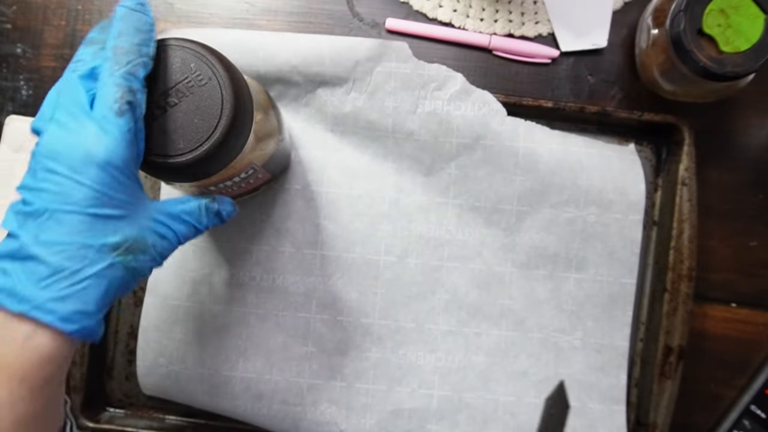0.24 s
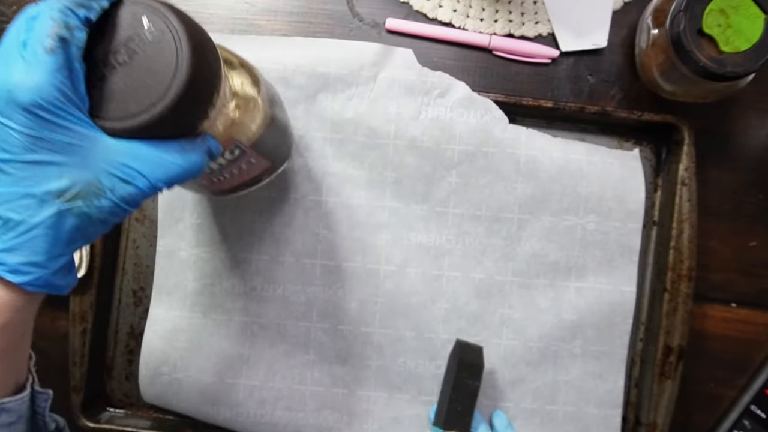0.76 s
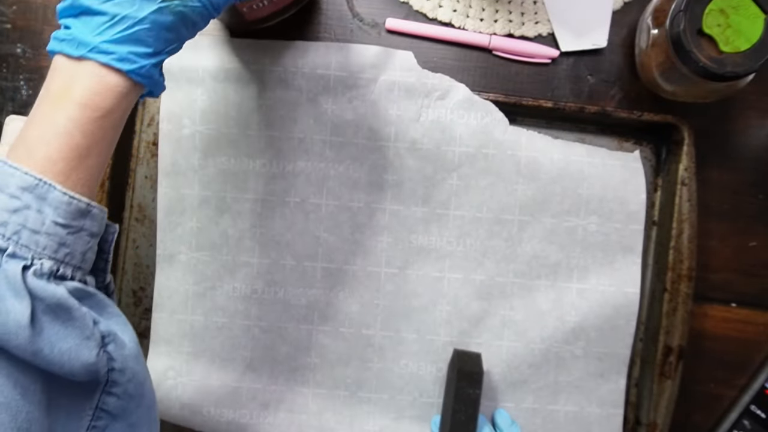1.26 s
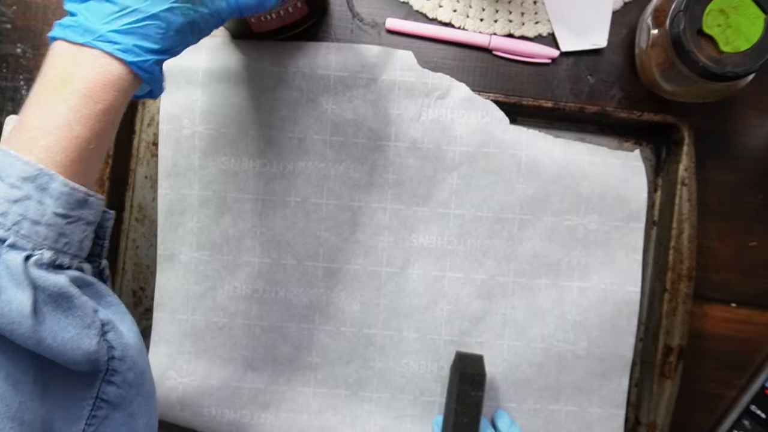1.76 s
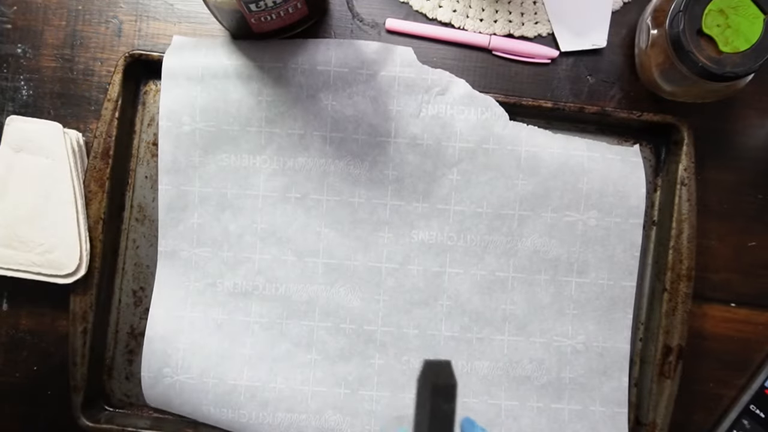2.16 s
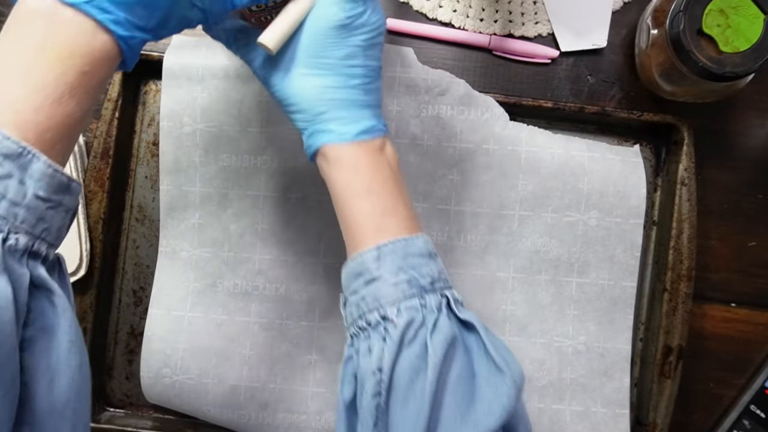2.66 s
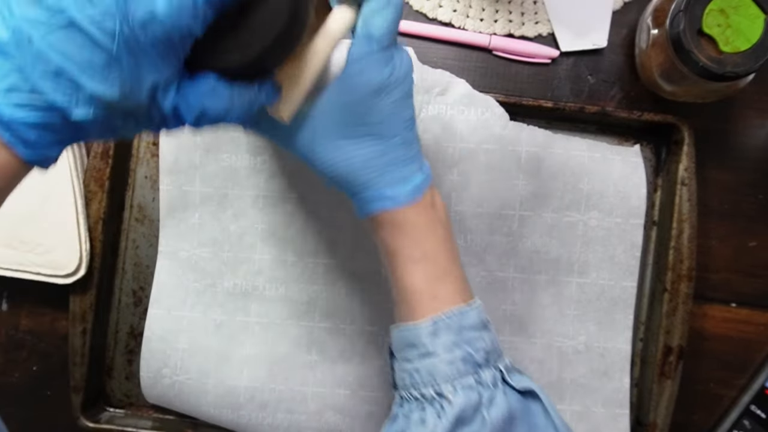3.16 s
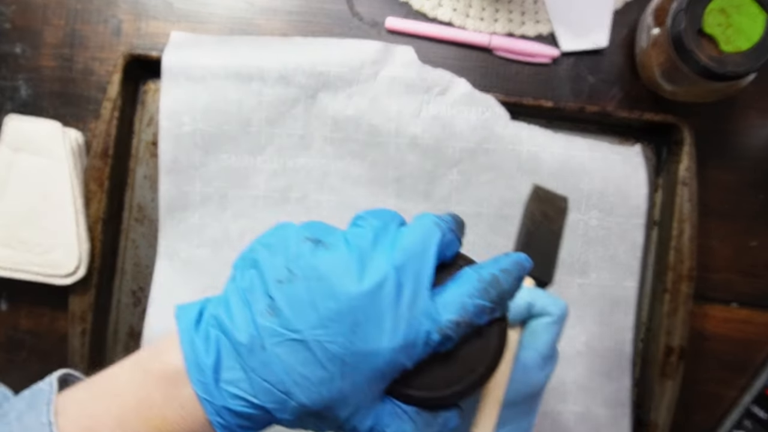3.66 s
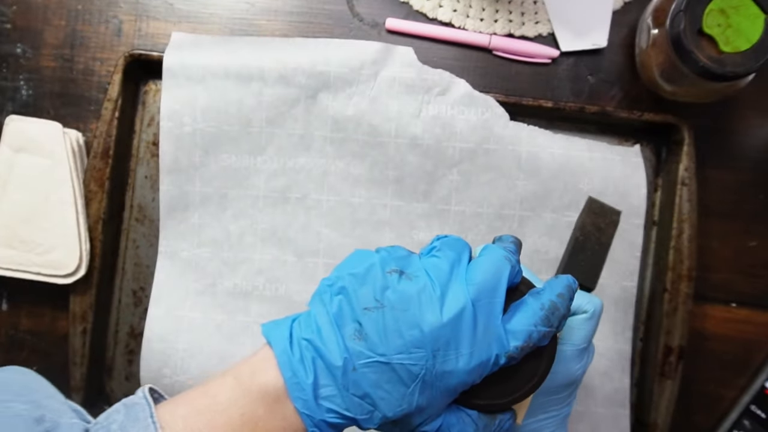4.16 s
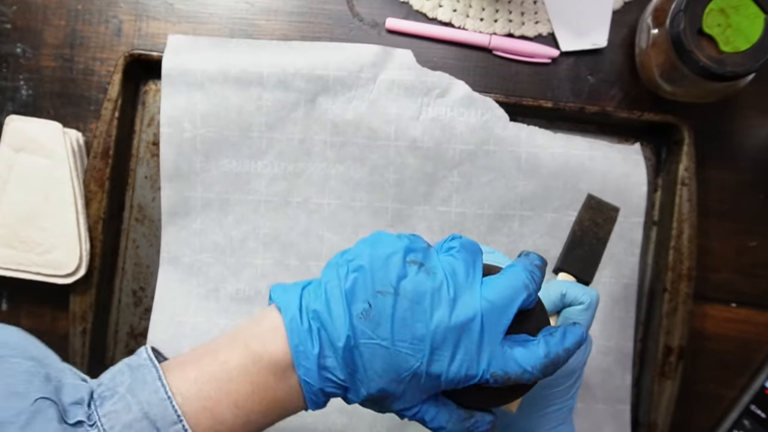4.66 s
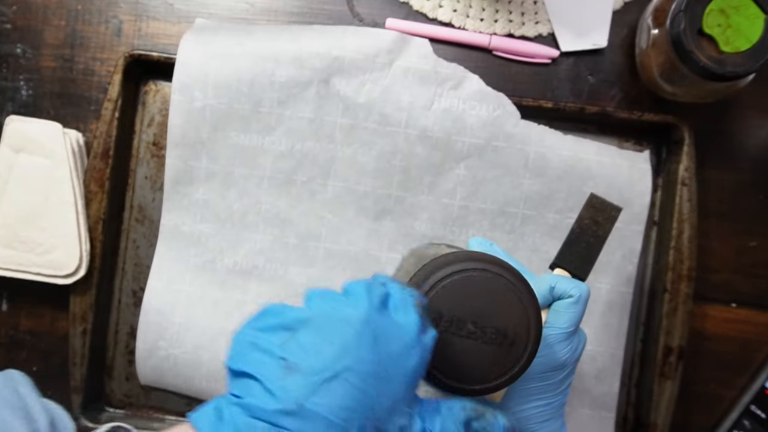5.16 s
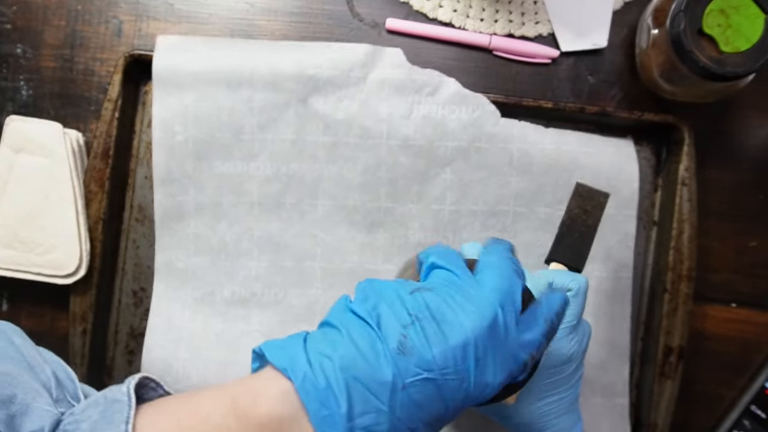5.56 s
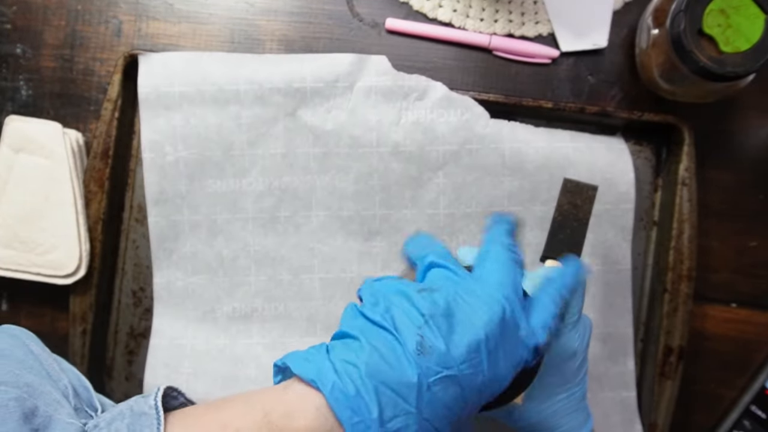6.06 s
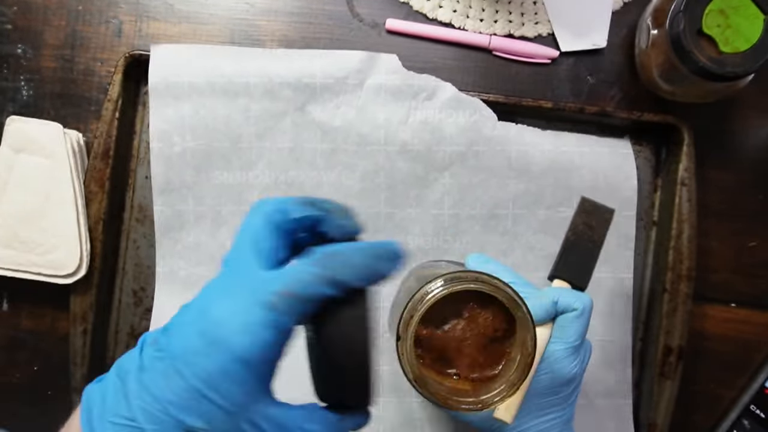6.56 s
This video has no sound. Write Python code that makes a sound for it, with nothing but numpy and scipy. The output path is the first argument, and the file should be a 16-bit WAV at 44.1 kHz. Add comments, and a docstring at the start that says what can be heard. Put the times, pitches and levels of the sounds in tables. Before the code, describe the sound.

Heard by a near stereo microphone with faint steady hiss and short room echo: brisk crinkling of gloves and paper, a low jar knock, then near quiet with small rubbery squeaks. Sharp knocks and gritty grinding follow on a thin metal tray, with brief hollow booms. The lid clicks against glass, scrapes round its thread and comes away, leaving light rustles.

```python
"""Gloved hands move a glass jar to a paper-lined tray and unscrew its plastic lid, close by in a small room.
0.3-2.4 s: gloves and paper rub (clumped tiny slips), creases snap (brief tones with crackle), the jar knocks.
2.4-3.6 s: faint rustle and squeaks (noise in narrow resonances). 4.2-5.7 s: the jar knocks and grinds on the
tray (struck modes), and its air booms. From 4.9 s the lid clacks on the glass; at 5.8-6.4 s it also rasps
along its thread and lifts off. Last rustles to the end; a faint stereo hiss lies under it all."""
import sys
import numpy as np
from scipy import signal
from scipy.io import wavfile
from scipy.ndimage import uniform_filter1d

SR = 44100
rng = np.random.default_rng(int(sys.argv[2]) if len(sys.argv) > 2 else 0)


def waveform_to_disk(signal):
    """Save audio, clipped to [-1, 1], as 16-bit WAV at the path in sys.argv[1]."""
    frames = np.transpose(np.atleast_2d(signal))
    scaled = np.clip(frames, -1, 1) * 32767
    samples = np.round(scaled).astype(np.int16)
    wavfile.write(sys.argv[1], SR, samples)


N = 300621
T = np.arange(N) / SR
RING_T = np.arange(16384) / SR
STEP_T = T[::32]  # coarse grid for movement gains
SAG_DB_PER_S = 20.5  # a movement eases while held

# spectrum of rubbed gloves and paper: (frequency [Hz], gain [dB])
RUB_COLOUR = [(88, -74), (150, -30), (197, -42), (280, -33), (315, -43.5), (578, -23.5), (730, -22),
              (805, -19.5), (1630, -2.5), (2650, 0.5), (8730, -8), (13700, -17.5), (16000, -28.5)]
# stereo width: (frequency [Hz], gain of the side signal [dB])
WIDTH = [(100, -51), (300, -16.5), (1000, -11), (2500, -9.5), (5000, -4.5), (9000, -0.5), (16000, -1.5)]


def amp(db):
    """Decibels to gain."""
    return 10 ** (np.asarray(db) / 20)


def evened(x):
    """Scales to rms 1."""
    return x / np.sqrt(np.mean(x ** 2) + 1e-20)


def struck(x):
    """Scales a blow to rms 1 over its first 20 ms."""
    return x / np.sqrt(np.mean(x[:SR // 50] ** 2) + 1e-20)


def read(points, hz):
    """Reads a spectrum on a log-frequency axis."""
    f, value = np.transpose(points)
    return np.interp(np.log(hz + 1), np.log(f + 1), value)


def add(mix, start_s, sound):
    """Mixes a sound in at a time."""
    part = mix[max(round(start_s * SR), 0):][:len(sound)]
    part += sound[:len(part)]


def cut(x, hz, kind, order=2):
    """Butterworth low-pass or high-pass."""
    sos = signal.butter(order, np.clip(hz, 20, SR / 2 - 1000), kind, fs=SR, output="sos")
    return signal.sosfilt(sos, x)


def colour(x, points):
    """Causal (minimum-phase) filter with a given spectrum."""
    hz = abs(np.fft.fftfreq(4096, 1 / SR))
    log_gain = np.log(amp(np.maximum(read(points, hz), -100)))
    taps = np.fft.ifft(np.exp(np.conj(signal.hilbert(log_gain)))).real[:2048]
    return signal.oaconvolve(x, taps)[:len(x)]


def ring(modes):
    """Dying sines of a struck body; neighbouring modes swing opposite ways."""
    out = np.zeros(len(RING_T))
    for k, (hz, db, t60_s) in enumerate(modes):
        decay = amp(db - 60 * RING_T / max(t60_s, 0.005))
        out += (-1) ** k * decay * np.sin(2 * np.pi * hz * RING_T)
    return out


def burst(t60_s):
    """Noise that dies away."""
    return rng.standard_normal(len(RING_T)) * amp(-60 * RING_T / max(t60_s, 0.001))


def slips(per_s, spread_db):
    """Random stick-slip clicks of rms 1; a wider spread makes a few much larger than the rest."""
    size = amp(spread_db * np.minimum(rng.exponential(1, N), 3.5))
    return evened(size * rng.choice([-1, 1], N) * (rng.random(N) < per_s / SR))


def patchy(x, patchy_db):
    """Patches of the spectrum rise and fall for a few milliseconds, as folds or surfaces shift."""
    z = signal.stft(x, nperseg=256, noverlap=192)[2]
    by_pitch = uniform_filter1d(rng.standard_normal(z.shape), size=7, axis=0)
    patches = evened(uniform_filter1d(by_pitch, size=5, axis=1))
    return signal.istft(z * amp(patchy_db * patches), nperseg=256, noverlap=192)[1][:len(x)]


def resonate(x, hz, width_hz):
    """A resonance that can follow a pitch curve: shift to 0 Hz, low-pass, shift back."""
    turn = np.exp(2j * np.pi * np.cumsum(hz * np.ones(len(x))) / SR)
    r = np.exp(-np.pi * width_hz / SR)
    return (turn * signal.lfilter([1 - r], [1, -r], x / turn)).real


def whistle(hz, width_hz, count):
    """Noise passed twice through a narrow resonance, at rms 1."""
    once = resonate(rng.standard_normal(count), hz, width_hz)
    return evened(resonate(once, hz, width_hz))


def stroke(start_s, rise_s, hold_s, db, release_db_per_s):
    """Gain of one movement on the coarse grid: it swells, eases while held, then dies away."""
    t = STEP_T - start_s
    rise_gain = np.clip(t / max(rise_s, 0.002), 0, 1) ** 1.2
    sag_db = SAG_DB_PER_S * np.maximum(t - rise_s, 0)
    release_db = release_db_per_s * np.maximum(t - rise_s - hold_s, 0)
    return rise_gain * amp(db - np.minimum(sag_db + release_db, 150))


def together(gains):
    """Overlapping movements add in power; gives one gain per sample."""
    return np.interp(T, STEP_T, np.sqrt(sum(gain ** 2 for gain in gains)))


def hush():
    """Steady faint stereo hiss of the room: filtered noise."""
    # hiss spectrum: (frequency [Hz], gain [dB])
    hiss_colour = [(18, -44), (30, -49), (98, -22), (355, -5.5), (801, 0.5), (1070, 1.5), (1860, 1),
                   (3400, 0.5), (4530, 4), (6720, -9), (14400, -14.5), (16000, -20)]
    mid, side = (evened(colour(z, hiss_colour)) for z in rng.standard_normal((2, N)))
    side = 1.66 * colour(side, WIDTH)
    return amp(-59.0) * np.array([mid + side, mid - side])


def room(x, wet_db):
    """Direct sound plus scattered echoes: decaying noise tails, differing between the channels."""
    # reverberation: (frequency [Hz], t60 [s])
    room_t60 = [(150, 0.42), (400, 0.46), (1000, 0.29), (3000, 0.3), (8000, 0.37), (16000, 0.38)]
    lean = 0.1  # slightly left of centre
    hz, t, z = signal.stft(rng.standard_normal((2, len(RING_T))), SR, nperseg=256)
    decay = amp(-60 * t / read(room_t60, hz)[:, None])
    tails = signal.istft(z * decay, SR, nperseg=256)[1][:, :len(RING_T)]
    tails = tails * np.clip(RING_T / 0.0023, 0, 1)
    mid, side = (amp(wet_db) * signal.oaconvolve(x, tail / np.linalg.norm(tail))[:N] for tail in tails)
    place = evened(uniform_filter1d(rng.standard_normal(N), size=300))  # contacts shift from spot to spot
    side = colour(side + (0.4 * place + lean) * x, WIDTH)
    return np.array([x + mid + side, x + mid - side])


def effort():
    """Gains of the gloves' rub and of its fizz, from all strokes and the resting grip."""
    # gloves over paper, jar and lid:
    # (start [s], rise [s], hold [s], relative level [dB], fizz relative to the stroke [dB])
    strokes = [(0.276, 0.044, 0.043, -47, -6), (0.418, .03, .02, -51.5, -10), (0.507, 0.082, .03, -43, -14),
               (0.597, 0.024, 0.1, -25, -19), (0.671, 0.063, 0.13, -24.5, -14.5),
               (0.999, 0.093, .015, -31.5, -17), (1.147, 0.015, 0.079, -39.5, -14.5),
               (1.268, 0.027, 0.0099, -33.5, -10.5), (1.425, 0.014, .005, -37.5, -10),
               (1.496, 0.056, 0.013, -32.5, -16), (1.751, 0.074, 0.069, -30.5, -13.5),
               (1.927, 0.024, 0.16, -37, -22), (2.106, 0.044, 0.076, -37.5, -13),
               (2.273, 0.0093, .005, -39, -16), (2.36, 0.024, 0.39, -49.5, -14),
               (2.662, 0.078, 0.038, -47.5, -5), (2.823, 0.057, 0.027, -48.5, -1.5),
               (3.15, 0.062, 0.11, -56.5, 8), (3.316, .05, 0.15, -46, -4.5), (3.469, 0.064, 0.046, -43, -7),
               (4.241, 0.024, 0.067, -36.5, -12.5), (4.454, 0.053, 0.011, -29.5, -13),
               (4.775, 0.014, 0.038, -20, -10), (4.803, 0.026, 0.01, -20, -6),
               (4.909, 0.074, 0.14, -25.5, -9.5), (5.24, 0.033, 0.18, -51.5, -5),
               (5.437, 0.067, 0.027, -27, -13), (5.522, 0.044, 0.021, -24.5, -9.5),
               (5.65, 0.039, 0.046, -32.5, -9.5), (5.841, 0.011, .01, -37, -4.5),
               (5.93, 0.077, 0.11, -46.5, -10), (6.357, 0.13, 0.011, -34.5, -10),
               (6.569, 0.071, 0.016, -35, -15), (6.73, 0.027, .05, -50.5, -10)]
    release_db_per_s = 153.5
    grip_db, grip_fizz_db = -64, -8.5  # gloves that merely hold on still rustle
    gains = [(stroke(*row, release_db_per_s), fizz_db) for *row, fizz_db in strokes]
    gains.append((amp(grip_db), grip_fizz_db))
    rub_gain = together(gain for gain, _ in gains)
    fizz_gain = together(gain * amp(fizz_db) for gain, fizz_db in gains)
    return rub_gain, fizz_gain


def rubbing(rub_gain, fizz_gain):
    """Tiny slips over a smooth hiss; in hard strokes the slips run together into hiss."""
    merged = np.clip((20 * np.log10(rub_gain) + 36) / 12, 0, 1)
    clicks = (1 - 0.45 * merged) * slips(per_s=3000, spread_db=2.0)
    hiss = (0.59 + 0.5 * merged) * rng.standard_normal(N)
    # slips come in clumps as folds give way
    decay = amp(-60 * RING_T / 0.012)
    clumps = evened(signal.oaconvolve(abs(slips(per_s=200, spread_db=1)), decay)[:N])
    clump_gain = 1.76 + 0.5 * (1 - 0.44 * merged) * (clumps - clumps.mean())
    grains = colour(patchy((clicks + hiss) * clump_gain, patchy_db=2.5), RUB_COLOUR)
    body = evened(cut(grains, 5590, "low", order=4))
    fizz = evened(cut(grains, 6800, "high", order=4))
    return amp(-0.5) * body * rub_gain + amp(-2.5) * fizz * fizz_gain


def squeaks():
    """Rubber sticks and slips on lid and glass at a rough pitch: short resonant noise."""
    # (time [s], length [s], pitch [Hz], width of each resonance pass [Hz], level [dB])
    squeak_rows = [(2.785, 0.014, 5430, 1500, -42.5), (2.791, 0.013, 2220, 300, -48),
                   (3.223, 0.025, 1790, 420, -40.5), (3.256, 0.031, 1890, 320, -48),
                   (3.348, 0.035, 5400, 600, -46.5), (3.468, 0.11, 3050, 380, -41.5),
                   (3.516, 0.04, 4330, 600, -40.5), (4.815, .022, 1680, 158, -38),
                   (5.996, 0.078, 3630, 170, -36.5)]
    out = np.zeros(N)
    for start_s, length_s, hz, width_hz, db in squeak_rows:
        count = int(length_s * SR)
        fade = signal.windows.tukey(count, 0.6)
        add(out, start_s, amp(db) * whistle(hz, width_hz, count) * fade)
    return out


def small_snaps(rub_gain):
    """Chance creases as the glove flexes round the jar, louder when it rubs harder."""
    start_s, stop_s, per_s = 0.65, 2.4, 24
    over_rub_db, spread_db, low_hz, high_hz = 10, 1, 1770, 3900
    times = np.arange(start_s, stop_s, 1 / per_s)
    when, size, pitch = rng.uniform(-1, 1, (3, len(times)))
    times = times + 0.5 * when / per_s
    db = 20 * np.log10(np.interp(times, T, rub_gain)) + over_rub_db + spread_db * size
    return list(zip(times, db, np.interp(pitch, [-1, 1], [low_hz, high_hz])))


def snaps(rub_gain):
    """A crease in glove or paper flips in a few cycles and leaves a short crackle."""
    # big creases: (time [s], relative level [dB], pitch [Hz])
    big_snaps = [(0.132, -40, 3240), (0.5286, -31.5, 1800), (0.62, -11, 4270), (0.6416, -14, 2520),
                 (0.7004, -4.5, 2520), (0.715, -8, 2040), (0.7428, -7.5, 5330), (0.7719, -9.5, 1880),
                 (0.8481, -10.5, 2500), (0.8595, -11.5, 1980), (0.9003, -11, 3040), (1.042, -17.5, 1960),
                 (1.0991, -13.5, 2360), (1.1867, -19.5, 2180), (1.261, -19.5, 3000), (1.2908, -15, 4400),
                 (1.2994, -14.5, 1920), (1.423, -10.5, 3420), (1.487, -22, 2270), (1.5166, -15.5, 3280),
                 (1.8294, -16, 3250), (1.8511, -9.5, 3250), (1.952, -13.5, 2550), (1.9897, -20, 4100),
                 (2.0386, -19, 3740), (2.0941, -19.5, 4050), (2.166, -22.5, 3630), (2.232, -17, 4460),
                 (2.604, -31.5, 4230), (2.6242, -29.5, 2880), (3.056, -37.5, 6800), (3.3643, -33, 5030),
                 (4.8309, -8, 2020), (5.7946, -22, 4440), (5.8602, -13, 4700), (6.3623, -24.5, 3460)]
    out = np.zeros(N)
    for start_s, db, hz in big_snaps + small_snaps(rub_gain):
        flip = np.sin(2 * np.pi * hz * RING_T) * np.exp(-RING_T * hz / 4)
        crackle = colour(burst(t60_s=0.029), RUB_COLOUR)
        snap = struck(cut(flip, 2000, "high")) + 0.9 * struck(crackle)
        add(out, start_s + 0.000907, amp(db - 20.0) * snap)
    return out


def hollow():
    """Air enclosed by jar, lid and hand booms at a pitch set by the grip, rising as the lid lifts."""
    # (start [s], rise [s], hold [s], relative level [dB], pitch before the lift [Hz])
    booms = [(1.547, .015, 0.12, -43.5, 223), (1.79, 0.028, 0.072, -53, 228),
             (4.786, 0.023, 0.0044, -34, 250), (4.88, 0.026, 0.0072, -34, 204),
             (5.02, 0.032, 0.045, -44, 232), (5.117, 0.039, 0.012, -35, 243), (5.528, 0.03, .04, -49, 243),
             (5.854, 0.0091, .16, -52.5, 260), (6.073, 0.038, .01, -30.5, 286),
             (6.193, 0.039, 0.0073, -41, 218), (6.302, .04, 0.023, -55.5, 325)]
    release_db_per_s = 324
    lift_s, lift_hz_per_s = 6.31, 1300  # the gap widens
    gains = [stroke(*row, release_db_per_s) for *row, _ in booms]
    power = np.square(gains) + 1e-20
    pitch_hz = np.transpose(booms)[-1] @ power / power.sum(0)  # the strongest boom leads
    pitch_hz = np.interp(T, STEP_T, pitch_hz) + lift_hz_per_s * np.maximum(T - lift_s, 0)
    air = 0.83 * whistle(pitch_hz, width_hz=37, count=N) + 0.31 * whistle(pitch_hz, width_hz=220, count=N)
    return air * together(gains)


def tray():
    """Blows and grinding of the jar shake the table and the damped metal sheet on it."""
    # jar on table and tray: (time [s], level [dB], hardness as low-pass cut-off [Hz], bass boost [dB])
    knocks = [(0.552, -61, 400, -3), (1.551, -20.5, 1640, 7.5), (1.793, -48, 1500, 15),
              (2.857, -42, 1390, 15), (2.882, -44.5, 990, 27), (3.2271, -53.5, 3000, -14),
              (4.282, -24.5, 4330, -15), (4.318, -27, 4900, -20), (4.382, -29, 3400, -11),
              (4.592, -36, 8000, 18), (4.5963, -12.5, 5250, -0.5), (4.6, -13, 4480, 8),
              (4.7798, -35, 7000, 23), (4.876, -28, 4000, -14), (4.906, -32.5, 1500, 8),
              (4.995, -24, 3940, -7), (5.013, -21, 3960, -28), (5.042, -27.5, 1080, -3),
              (5.116, -30, 4030, -15), (5.579, -28.5, 3020, -23)]
    # grinding pushes: (start [s], rise [s], hold [s], relative level [dB])
    pushes = [(1.788, .012, .01, -35.5), (4.275, 0.024, .03, -29), (4.374, 0.014, 0.042, -29.5),
              (4.491, 0.0084, 0.015, -35.5), (4.78, 0.025, .17, -35), (4.984, .055, .005, -27),
              (5.067, 0.018, 0.11, -30.5), (5.533, 0.038, 0.022, -32)]
    # metal modes: (frequency [Hz], relative level [dB], t60 [s])
    tray_modes = [(205.3, 1.5, 0.26), (373, -7.5, 0.1), (433, -16.5, 0.058), (502.5, -1.5, 0.11),
                  (575, -10.5, 0.2), (737, -7, 0.36), (886, -23, .08), (935, -8.5, 0.22), (1104, 0, 0.16),
                  (1230, -12.5, .1), (1280, 9.5, 0.055), (1600, 0.5, 0.091), (2017, 1.5, 0.14),
                  (2240, -18.5, 0.051), (2830, -0.5, .1), (3153, 11, 0.094), (4550, -6, .1)]
    # low sheet modes: (frequency [Hz], relative level [dB], t60 [s])
    sheet_modes = [(144.4, -8.5, 0.36), (207, 0, 0.26), (288, -7, 0.18), (370.4, -15.5, 0.47)]
    # crowd of close modes: (frequency [Hz], gain [dB])
    crowd_colour = [(59, -54), (100, -22.5), (193, -19), (583, -10.5), (648, -10), (721, -8), (872, -5),
                    (1230, -10), (1580, -6), (1950, -4), (5190, -12.5), (13200, -23.5), (16000, -50)]
    metal_share, metal_hz = 0.46, 4000  # harder blows ring the metal more, up to this share and hardness
    release_db_per_s = 297.5

    modes, sheet = struck(ring(tray_modes)), struck(ring(sheet_modes))
    out = np.zeros(N)
    for start_s, db, hard_hz, bass_db in knocks:
        metal = metal_share * min(hard_hz / metal_hz, 1) ** 2
        crowd = struck(colour(burst(t60_s=0.17), crowd_colour))
        blow = metal * modes + 0.92 * crowd + 0.097 * sheet
        blow = blow + (amp(bass_db) - 1) * cut(blow, 650, "low", order=1)
        add(out, start_s, amp(db) * struck(cut(blow, hard_hz, "low")))

    body = 0.3 * modes + struck(colour(burst(t60_s=0.039), crowd_colour)) + 0.018 * sheet
    drag = slips(per_s=600, spread_db=6)
    grit = evened(cut(signal.oaconvolve(drag, body)[:N], 1900, "low"))
    return out + amp(-2.5) * grit * together(stroke(*push, release_db_per_s) for push in pushes)


def lid():
    """The lid rasps by slips along its thread and clacks on the glass neck; the hand damps it quickly."""
    # lid on neck: (time [s], level [dB], hardness as low-pass cut-off [Hz])
    clacks = [(4.883, -30, 3000), (5.12, -38, 2500), (5.192, -34.5, 2480), (5.217, -39.5, 2200),
              (5.923, -33, 2120), (6.004, -35, 4000), (6.011, -27, 4000), (6.048, -40, 9000),
              (6.0692, -12, 6000), (6.0761, -22.5, 4000), (6.089, -17.5, 2540), (6.119, -24.5, 1810),
              (6.208, -48, 3000), (6.233, -46, 2000), (6.325, -44.5, 9100)]
    # riding on the last turn of thread: (start [s], rise [s], hold [s], level [dB])
    turns = [(5.898, 0.089, 0.045, -38.5), (5.948, 0.077, 0.072, -31.5), (6.062, 0.03, 0.016, -28.5),
             (6.184, 0.018, 0.017, -49), (6.302, 0.052, .01, -47)]
    # lid modes, the lowest being the enclosed air rung by the clack:
    # (frequency [Hz], relative level [dB], t60 [s])
    lid_modes = [(292, -35, 0.48), (910, -16, 0.031), (1403, -2.5, 0.02), (1563, 1.5, 0.018),
                 (1727, -5.5, 0.034), (2310, -32, 0.022), (3240, -14.5, 0.083), (3524, -10.5, 0.042),
                 (4150, -6.5, 0.023), (5700, -30, 0.016)]
    # spectrum of blow noise and rasp: (frequency [Hz], gain [dB])
    lid_colour = [(60, -38.5), (250, -11), (480, -27), (700, -9), (950, -8.5), (1200, -9.5), (1600, 1),
                  (1950, -6.5), (2900, -10), (3600, -14), (4300, -11), (6000, -16.5), (10000, -27),
                  (16000, -42)]
    release_db_per_s = 290

    out = np.zeros(N)
    for start_s, db, hard_hz in clacks:
        grip = rng.normal(1, 0.0082, len(lid_modes))  # the grip detunes the modes from blow to blow
        modes = ring([(hz * g, mode_db, t60_s) for g, (hz, mode_db, t60_s) in zip(grip, lid_modes)])
        blow = struck(modes) + 0.7 * struck(colour(burst(t60_s=0.009), lid_colour))
        add(out, start_s, amp(db) * struck(cut(blow, hard_hz, "low", order=1)))

    rasp = evened(colour(patchy(slips(per_s=850, spread_db=0.0), patchy_db=4), lid_colour))
    return out + rasp * together(stroke(*turn, release_db_per_s) for turn in turns)


def scene():
    """Room hiss, gloves, and the jar with its lid, each source with its own share of echoes."""
    rub_gain, fizz_gain = effort()
    gloves = rubbing(rub_gain, fizz_gain) + squeaks() + snaps(rub_gain)
    jar = room(tray() + hollow(), wet_db=-8.0) + room(lid(), wet_db=-6.0)
    return hush() + room(gloves, wet_db=-9.5) + jar


def record(dry):
    """The microphone sheds deep bass; peaks beyond full scale clip; then the band limit."""
    bass_leak_db, edge_hz = -40, 16200
    clipped = np.clip(cut(dry, 155, "high", order=3) + amp(bass_leak_db) * dry, -1, 1)
    taps = signal.firwin(511, edge_hz, window=("kaiser", 9), fs=SR)
    return signal.oaconvolve(clipped, taps[None], "same")


dry = scene()
out = record(dry)
waveform_to_disk(out)
```